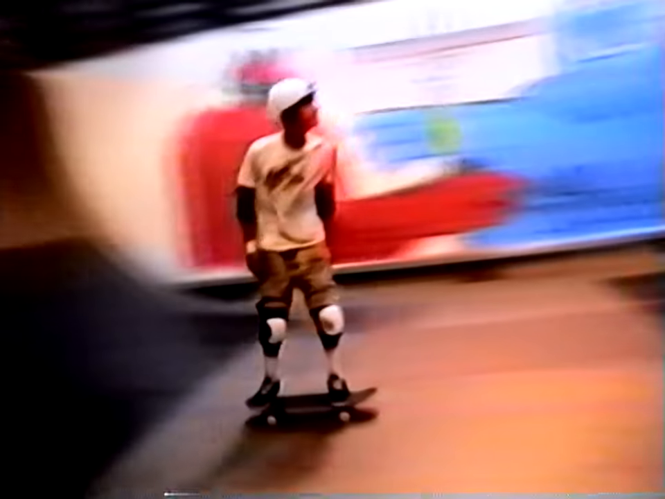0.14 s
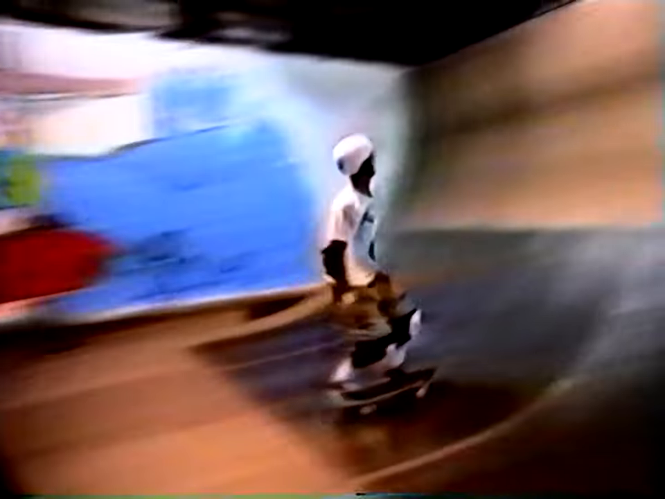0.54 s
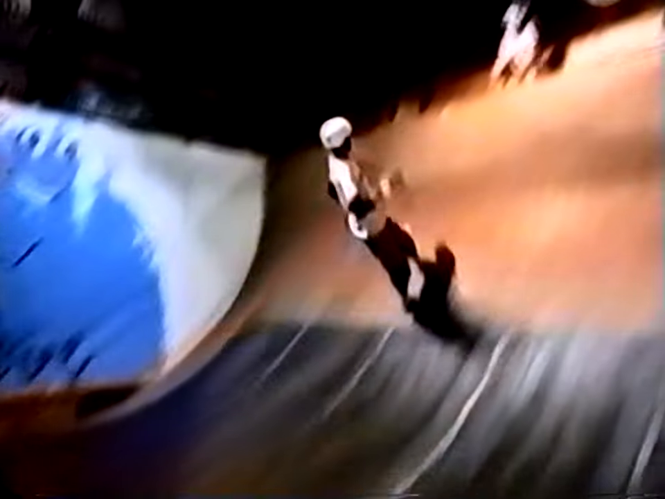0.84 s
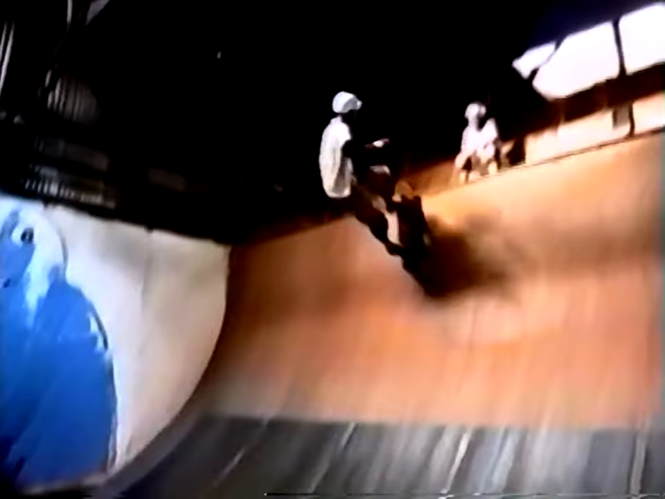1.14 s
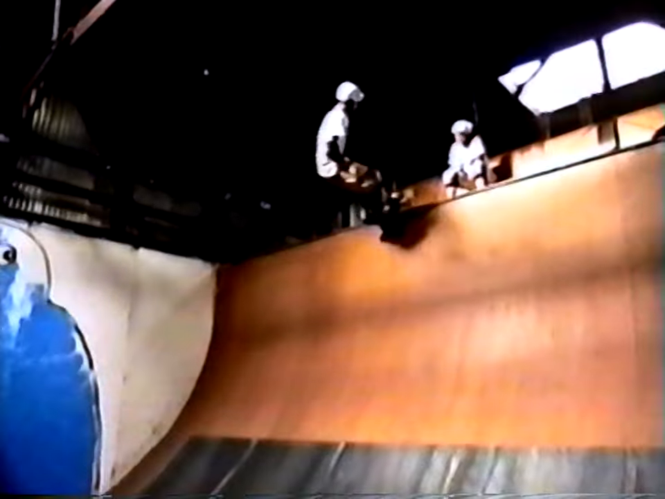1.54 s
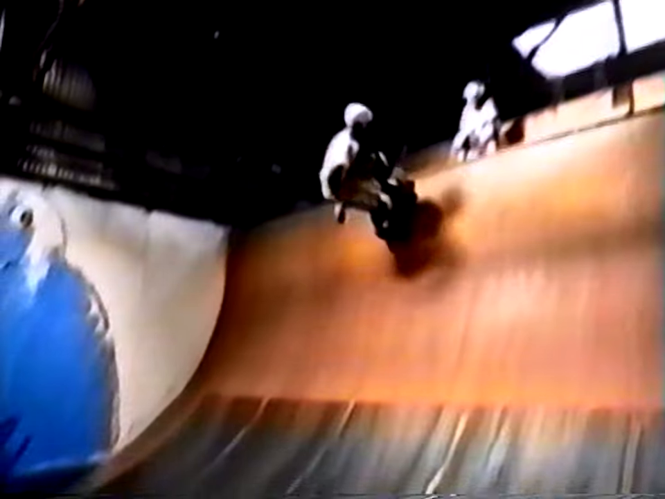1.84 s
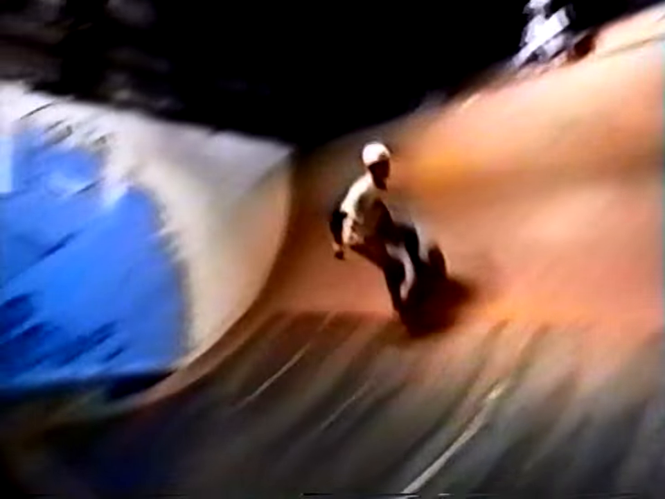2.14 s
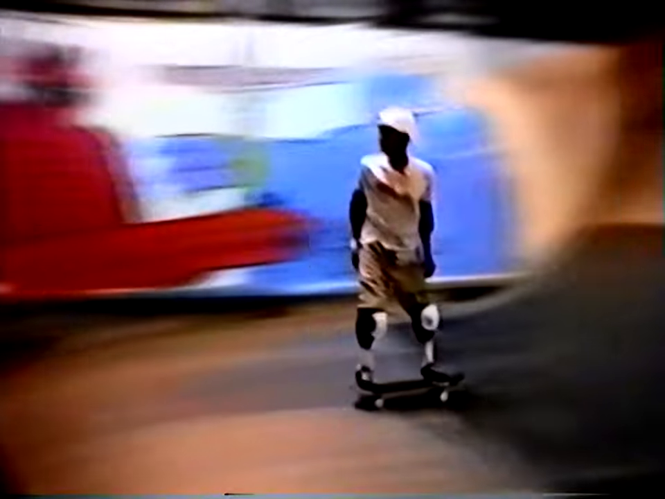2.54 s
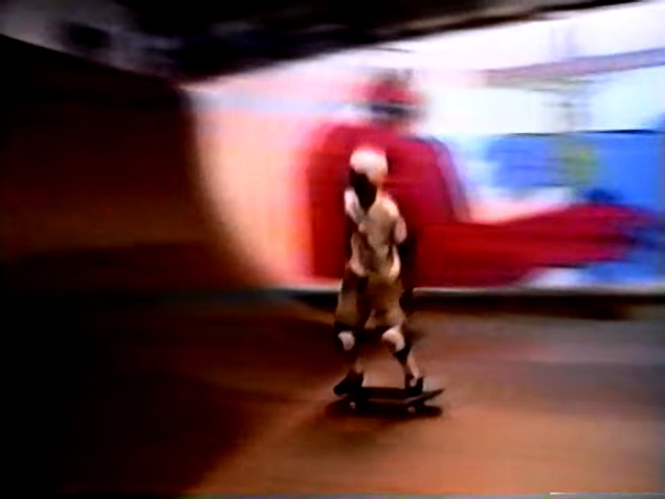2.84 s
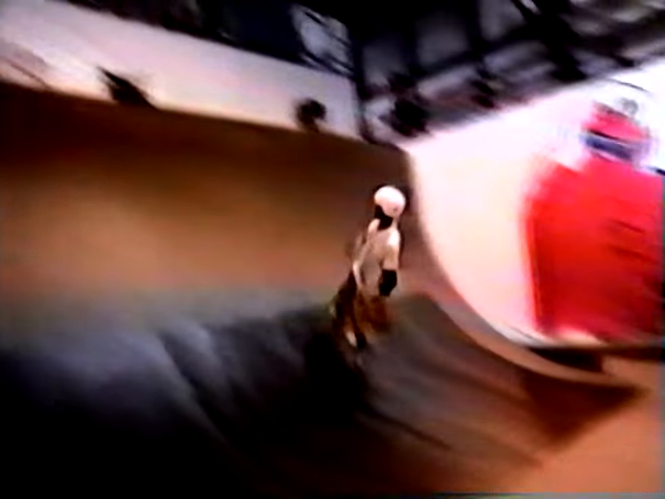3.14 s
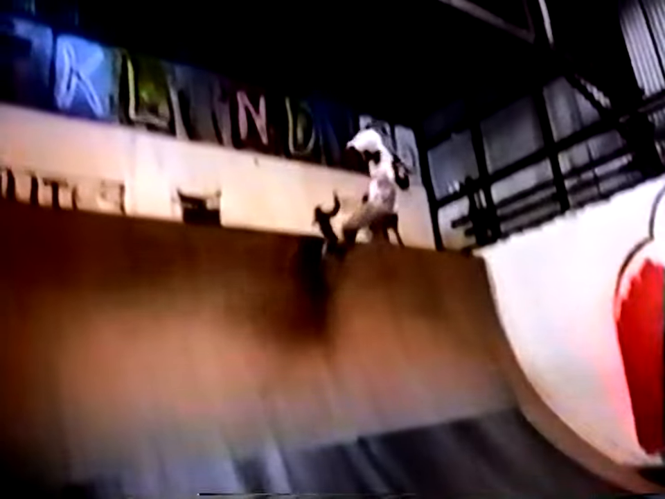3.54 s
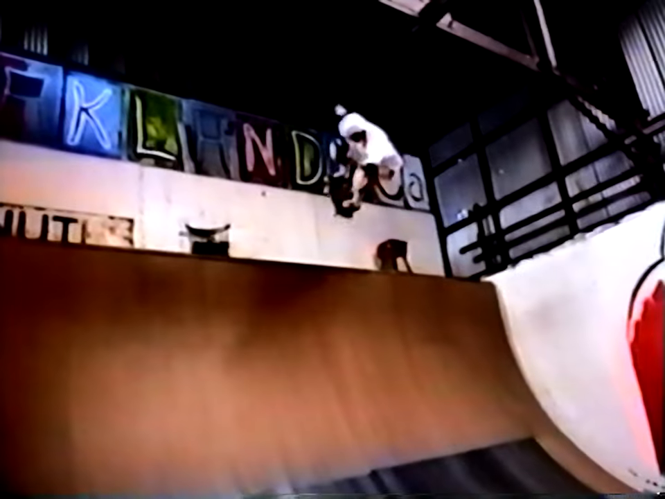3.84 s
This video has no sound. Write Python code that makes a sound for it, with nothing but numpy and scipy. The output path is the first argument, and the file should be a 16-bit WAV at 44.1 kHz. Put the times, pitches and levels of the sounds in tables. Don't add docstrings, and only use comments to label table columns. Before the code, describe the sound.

Skateboard wheels roll on a hollow wooden ramp, low and rough, with seam knocks clustering from 0.3 to 0.9 s. The rumble thins; axles clack and scrape the lip at 1.35 s, with lighter taps near 1.5 and a double clack at 1.8. Dense knocking returns around 1.9-2.3, hollow booms follow until 3.0, then a climb, a hard metallic slam at 3.44 and a fading hall echo. Muffled, hissy microphone.

```python
import sys
import numpy as np
from scipy import signal
from scipy.fft import rfft, irfft, next_fast_len
from scipy.io import wavfile
from scipy.ndimage import uniform_filter1d

SR = 44100
rng = np.random.default_rng(int(sys.argv[2]) if len(sys.argv) > 2 else 0)


def how_loud(loudness_db):
    steps = np.asarray(loudness_db, float) / 20
    return 10 ** steps


def master_out(mix):
    frames = np.transpose(np.atleast_2d(mix))
    ceiling = np.clip(frames, -1, 1)
    pcm = np.round(ceiling * 32767).astype(np.int16)
    wavfile.write(sys.argv[1], SR, pcm)


N = 176400


def in_time(rows):
    s, *columns = np.transpose(rows)
    return [np.interp(np.arange(N) / SR, s, column) for column in columns]


def at_hz(points, hz):
    table_hz, value = np.array(points).T[:2]
    return np.interp(np.log(hz + 1), np.log(table_hz), value)


def rms_one(x):
    return x / np.sqrt(np.mean(x ** 2) + 1e-20)


def band_filter(x, order, hz, kind):
    return signal.sosfilt(signal.butter(order, hz, kind, fs=SR, output="sos"), x)


def coloured(x, spectrum):
    size = next_fast_len(len(x) + SR // 2)
    log_gain = at_hz(spectrum, np.fft.rfftfreq(size, 1 / SR)) * np.log(10) / 20
    cepstrum = irfft(log_gain, size)
    cepstrum[1:size // 2] *= 2
    cepstrum[size // 2 + 1:] = 0
    response = np.exp(rfft(cepstrum))
    return rms_one(irfft(rfft(x, size) * response, size)[:len(x)])


def drift(rate):
    r = np.exp(-80 * np.pi * rate / SR)
    white = rng.standard_normal(N // 40 + 2002)
    slow = signal.lfilter([1], [1, -2 * r, r * r], white)[2000:]
    return np.interp(np.arange(N) / 40, np.arange(len(slow)), rms_one(slow))


def clicks(s, db):
    out = np.full(N, 1e-18)
    np.add.at(out, (np.asarray(s) * SR).astype(int), how_loud(np.asarray(db)))
    return out


def ring(x, hz, t60):
    r, w = how_loud(-60 / (t60 * SR)), 2 * np.pi * hz / SR
    return signal.lfilter([0, np.sin(w)], [1, -2 * r * np.cos(w), r * r], x)


def soft(x, hz):
    return band_filter(x, 2, min(hz, 8000), "low")


def cracks(s, db):
    decay_s, level_db = 0.003, 0.5
    shape = signal.lfilter([1], [1, -np.exp(-1 / (decay_s * SR))], clicks(s, db + level_db))
    return band_filter(shape * rng.standard_normal(N), 2, [250, 1500], "band")


def gate(spans):
    t = np.arange(N) / SR
    inside = sum((t >= a) & (t <= b) for a, b in spans).astype(float)
    return uniform_filter1d(inside, size=200)


def held(s, hold, db, fade_db):
    t = np.arange(N) / SR
    start = np.clip((t - s) / 0.00097, 0, 1)
    return start * how_loud(db - fade_db * np.clip(t - s - hold, 0, 4))


# time in seconds, level on the flat in dB, level on the curved wall in dB.
WHEEL_LOAD = [(0, -37.5, -28), (.24, -32.5, -31.5), (.38, -29, -26.5), (.6, -32.5, -31.5), (.76, -31, -25),
              (.95, -50.5, -26.5), (1.15, -40, -35), (1.33, -47, -45.5), (1.75, -40.5, -39),
              (1.95, -27.5, -28), (2.15, -28, -24), (2.5, -28, -35), (2.75, -25.5, -36.5),
              (3.02, -26.5, -33.5), (3.2, -32, -22), (3.33, -40.5, -25.5), (3.5, -38.5, -35),
              (4.0, -60.5, -46)]
# frequency in Hz, level in dB per Hz.
FLAT_COLOUR = [(30, -21.5), (60, -7.5), (100, -5.5), (200, -4), (330, -12), (700, -21), (1500, -46.5),
               (3200, -65), (4200, -89), (8000, -125)]
# frequency in Hz, level in dB per Hz.
WALL_COLOUR = [(18, -38), (30, -21.5), (92, -17.5), (236, -5.5), (393, -4.5), (523, -3.5), (696, -8),
               (1180, -21), (3950, -47.5), (5140, -79.5), (8690, -120)]


def rolling():
    flat_trim_db, wall_trim_db = 1.5, -1
    bumps_per_s, bump_spread_db, bump_db = 140, 3.0, -10
    wobble_db, wobble_per_s = 1.5, 10
    lift_s, lift_db = .009, -8
    flat_db, wall_db = in_time(WHEEL_LOAD)
    sizes = how_loud(bump_spread_db * np.minimum(rng.exponential(1, N), 3)) * rng.choice([-1, 1], N)
    bumps = rms_one(sizes * (rng.random(N) < bumps_per_s / SR))
    unloaded = gate([(s - lift_s, s) for s, *_ in SEAM_CROSSINGS])
    road = rng.standard_normal(N) + how_loud(bump_db) * bumps
    road = road * how_loud(wobble_db * drift(wobble_per_s) + lift_db * unloaded)
    boom_db = -32.5 + 2.3 * (flat_db - flat_db.max())
    boom = how_loud(boom_db) * rms_one(ring(road, hz=96, t60=0.4))
    flat = how_loud(flat_db + flat_trim_db) * coloured(road, FLAT_COLOUR)
    wall = how_loud(wall_db + wall_trim_db) * coloured(road, WALL_COLOUR)
    return boom + flat + wall


# time in seconds, peak level in dB, knock frequency in Hz, tick level in dB relative to the knock.
SEAM_CROSSINGS = [(0.009, -28.5, 380, -13), (0.098, -16, 474, -14), (0.113, -16.5, 410, -7.5),
                  (0.31, -16, 620, -16), (0.366, -8.5, 507, -10.5), (0.396, -23.5, 464, -21),
                  (0.421, -15, 567, -21), (0.461, -18, 602, -19), (0.703, -11.5, 427, -9.5),
                  (0.752, -12, 433, -7), (0.761, -17.5, 420, -24), (0.823, -12, 437, -18),
                  (0.875, -15.5, 402, -20), (0.908, -25, 440, -27), (1.109, -27.5, 750, -3),
                  (1.158, -27.5, 510, 0.5), (1.203, -18.5, 737, -17), (1.206, -30, 480, -4),
                  (1.726, -21, 530, -23), (1.856, -23.5, 402, -25), (1.9, -12, 422, -23),
                  (1.932, -17.5, 498, -34), (1.963, -12, 393, -31), (1.993, -14.5, 487, -21),
                  (2.02, -13, 467, -22), (2.044, -13, 470, -32), (2.066, -9, 563, -24),
                  (2.091, -13.5, 528, -8), (2.117, -8.5, 392, -16.5), (2.138, -10.5, 470, -8.5),
                  (2.178, -11.5, 495, -14), (2.218, -14, 453, -18), (2.256, -16, 388, -21),
                  (2.411, -14, 348, -15), (2.553, -18.5, 361, -9.5), (2.635, -17.5, 296, -10.5),
                  (2.728, -22, 320, -6), (2.827, -22.5, 579, -7), (2.94, -18.5, 456, -16.5),
                  (2.989, -15.5, 510, -11), (2.67, -15, 279, -13), (2.812, -28, 555, -26),
                  (2.875, -19.5, 584, -3.5), (3.133, -16.5, 606, -5), (3.177, -15, 503, -6.5),
                  (3.221, -20, 520, -20), (3.247, -14.5, 494, -16), (3.283, -13, 500, -19),
                  (3.296, -16, 481, -26), (3.321, -14, 520, -25), (3.396, -17, 440, -27)]


def seams():
    wheel_soft_hz, tick_soft_hz = 900, 3200
    tick_lag_s, tick_t60_s = .001, 0.014
    s, db, hz, tick_db = np.transpose(SEAM_CROSSINGS)
    knocks = sum(ring(clicks([a], [b]), c, t60=0.035) for a, b, c in zip(s, db, hz))
    taps = clicks(s + tick_lag_s, db + tick_db - 8)
    wheel_tick = ring(taps, 1350, tick_t60_s)
    axle_tick = how_loud(-11) * ring(taps, 2800, tick_t60_s)
    ticks = wheel_tick - axle_tick + cracks(s, db + tick_db)
    return soft(ticks, tick_soft_hz) - soft(knocks, wheel_soft_hz)


# time in seconds, peak level in dB, frequency in Hz, 60 dB decay time in seconds.
BOOMS_AND_PINGS = [(0.114, -32, 171, 0.081), (0.167, -38, 150, .07), (0.36, -11.5, 130, 0.043),
                   (0.424, -18, 225, 0.11), (0.757, -28, 189, 0.13), (1.169, -26.5, 206, 0.13),
                   (1.204, -35, 1210, 0.058), (1.351, -19.5, 375, .04), (1.365, -25, 2090, 0.013),
                   (1.529, -31, 1520, .03), (1.501, -31, 80, 0.065), (1.644, -28, 1340, 0.019),
                   (1.676, -18, 136, 0.039), (1.695, -28, 59, .1), (1.792, -15.5, 190, 0.033),
                   (1.796, -20, 387, 0.048), (2.433, -17.5, 95.4, 0.14), (2.56, -12, 197, 0.081),
                   (2.621, -17, 120, .1), (2.705, -18, 101.4, 0.22), (2.68, -19.5, 152, 0.096),
                   (2.735, -13.5, 150.5, 0.14), (2.777, -14, 111, .12), (2.99, -19, 199, 0.085),
                   (3.442, -21, 275, 0.27), (3.444, -28, 1280, .035), (3.441, -39, 2370, .025),
                   (3.447, -48.5, 3060, 0.21), (3.625, -50, 3060, 0.18), (3.669, -27.5, 258, 0.081),
                   (3.7, -32.5, 1280, 0.17), (3.871, -37, 1350, .04), (3.89, -42, 1310, .06)]


def thuds():
    return -sum(soft(ring(clicks([s], [db]), hz, t60), 2 * hz) for s, db, hz, t60 in BOOMS_AND_PINGS)


# time in seconds, peak level in dB, share sent to the hall in dB, contact hardness in Hz.
LIP_BLOWS = [(1.35, -12.5, -15, 3000), (1.395, -25, -18, 1500), (1.509, -22.5, -32, 1500),
             (1.535, -21, -30.5, 1500), (1.7884, -25, -24.5, 900), (1.7922, -12.5, -27, 1020),
             (1.7953, -13, -16.5, 990), (1.81, -24.5, -32, 1300), (3.442, -9.5, -9, 3000),
             (3.448, -16, -20, 3000), (3.52, -17.5, -4.5, 1190)]
# frequency in Hz, level in dB, 60 dB decay time in seconds.
DECK_MODES = [(280, -3, .04), (430, 0, .03), (560, 0, .03), (720, -3, .025), (1000, -8, .02),
              (1500, -13, .015), (2100, -19, .012)]


def clacks():
    chance_db = 2 * rng.standard_normal((len(LIP_BLOWS), len(DECK_MODES)))
    out = 0
    for (s, db, _, hard_hz), row_db in zip(LIP_BLOWS, chance_db):
        blow = soft(clicks([s], [db]), hard_hz)
        for k, (hz, level_db, t60) in enumerate(DECK_MODES):
            out = out + how_loud(level_db - 4 + row_db[k]) * ring(blow, hz, t60) * (-1) ** k
    return out + cracks(*np.transpose(LIP_BLOWS)[:2])


# start in seconds, hold in seconds, level in dB, fade in dB per second.
LIP_GRINDS = [
    (1.351, 0.14, -38.5, 63),
    (3.454, 0.14, -33.5, 62),
    (.722, .07, -43, 120),
    (3.16, .11, -45, 120),
]
GRIND_SHEEN_DB = [8, -6, -9.5, -13.5]
# frequency in Hz, level in dB per Hz.
GRIND_COLOUR = [(250, -26.5), (500, -3.5), (1000, -2.5), (1600, -12), (2200, -20), (3200, -26.5),
                (4200, -31), (5200, -58.5), (8000, -110)]
# start in seconds, hold in seconds, level in dB, fade in dB per second.
PIPE_SINGING = (3.45, .2, -57, 90)


def grinds():
    pipe_hz, pipe_t60_s = 3060, .12
    grit = how_loud(-0.5 * drift(30)) * coloured(rng.standard_normal(N), GRIND_COLOUR)
    sheen = band_filter(grit, 2, 1810, "high")
    pipe = rms_one(ring(ring(grit, pipe_hz, pipe_t60_s), pipe_hz, pipe_t60_s))
    out = held(*PIPE_SINGING) * pipe
    for row, sheen_db in zip(LIP_GRINDS, GRIND_SHEEN_DB):
        out = out + held(*row) * (grit - how_loud(sheen_db) * sheen)
    return out


# frequency in Hz, level in dB per Hz.
HALL_COLOUR = [(50, -44), (150, -5.5), (300, 3), (650, 2.5), (1300, -4.5), (2200, -16.5), (3200, -30.5),
               (4200, -44.5), (5200, -75.5), (8000, -120)]
# frequency in Hz, 60 dB decay time in seconds.
HALL_DECAY = [(150, 1.6), (500, 1.09), (1200, 1), (2500, 0.8), (4500, 0.83)]


def hall():
    gap_s, rise_s, seam_share_db = 0.0039, 0.0067, -32
    t = np.arange(2 * SR) / SR
    edges_hz = 50 * 2 ** np.arange(0, 7.1, .5)
    white = coloured(rng.standard_normal(len(t)), HALL_COLOUR)
    tail = 0
    for low, high in zip(edges_hz, edges_hz[1:]):
        t60 = at_hz(HALL_DECAY, np.sqrt(low * high))
        tail = tail + band_filter(white, 2, [low, high], "band") * how_loud(-60 * t / t60)
    tail = tail * np.clip((t - gap_s) / rise_s, 0, 1)
    s, db, share_db, _ = np.transpose(LIP_BLOWS)
    knock_s, knock_db = np.transpose(SEAM_CROSSINGS)[:2]
    blows = clicks(s, db + share_db) + clicks(knock_s, knock_db + seam_share_db)
    return signal.fftconvolve(blows, tail)[:N]


# frequency in Hz, level in dB per Hz.
MURMUR_COLOUR = [(18, -27.5), (30, -8.5), (314, -9), (820, -24), (965, -16.5), (1050, -3), (3950, -35.5),
                 (5140, -68), (8690, -120)]


def murmur():
    return how_loud(-50.5) * coloured(rng.standard_normal(N), MURMUR_COLOUR)


def scene():
    ramp = rolling() + seams() + thuds()
    lip = clacks() + hall() + grinds()
    return np.tile(ramp + lip + murmur(), (2, 1))


def without_faint_treble(x):
    floor_db, always_kept_hz, band_bins = -87, 2600, 14
    frame = dict(nperseg=2048, noverlap=1024, window=np.sqrt(signal.get_window("hann", 2048)))
    hz, _, z = signal.stft(x[0], SR, **frame)
    power = uniform_filter1d(np.abs(z) ** 2, size=band_bins, axis=0)
    power = power[::band_bins].repeat(band_bins, axis=0)[:len(hz)]
    threshold = how_loud(2 * floor_db + 5.0 * rng.standard_normal(z.shape[1]))
    strong = (power > threshold) | (hz[:, None] < always_kept_hz)
    kept = np.maximum.accumulate(strong[::-1], axis=0)[::-1]
    return signal.istft(z * kept, SR, **frame)[1][:N]


# start in seconds, end in seconds.
BEARING_SPANS = [(0.0, .03), (.095, .115), (.31, .35), (.415, .44), (.72, .82), (2.16, 2.19),
                 (2.905, 2.925), (3.14, 3.32), (3.5, 3.6)]


def bearings(white):
    centre_hz, width_hz = 6450, 1280
    edges_hz = [centre_hz - width_hz / 2, centre_hz + width_hz / 2]
    return how_loud(-70.5) * gate(BEARING_SPANS) * rms_one(band_filter(white, 4, edges_hz, "band"))


# start in seconds, end in seconds.
HISS_AUDIBLE = [(.03, .05), (.14, .16), (.2, .285), (.585, .67), (.695, .715), (1.035, 1.375), (1.41, 1.78),
                (1.84, 1.89), (3.165, 3.185), (3.595, 4.0)]


def tape_hiss(white, side_white):
    hiss = how_loud(-61.5) * band_filter(white, 1, 11000, "low")
    scan = how_loud(-87) * np.sin(2 * np.pi * 15625 * np.arange(N) / SR)
    side = how_loud(-78) * side_white * [[1], [-1]]
    return gate(HISS_AUDIBLE) * (hiss + scan + side)


def roll_off(x):
    return signal.sosfilt(signal.butter(12, 15760, fs=SR, output="sos"), x)


CHANNEL_OFFSET = [
    [.0077],
    [-.0253],
]


def record(dry):
    peak_limit = .45
    x = band_filter(dry, 6, 3720, "low")
    x = band_filter(x, 4, 44, "high")
    white = rng.standard_normal((3, N))
    x = x + (1 - gate(HISS_AUDIBLE)) * (without_faint_treble(x) - x)
    rounded = peak_limit * np.tanh(x / peak_limit)
    mix = rounded + tape_hiss(white[0], white[1]) + bearings(white[2]) + np.array(CHANNEL_OFFSET)
    return roll_off(mix)


dry = scene()
out = record(dry)
master_out(out)
```